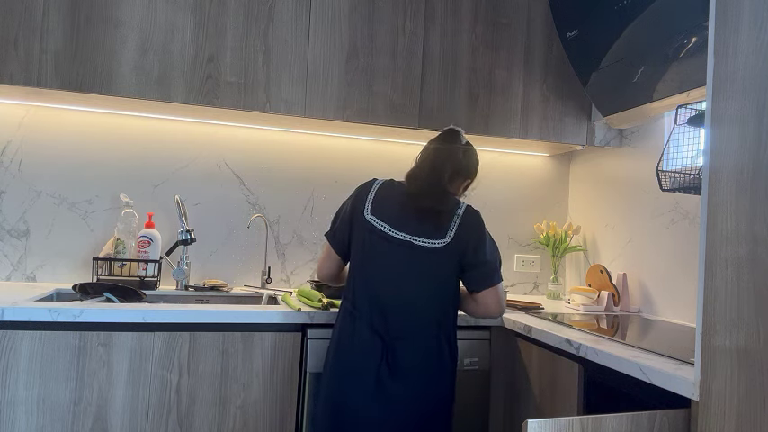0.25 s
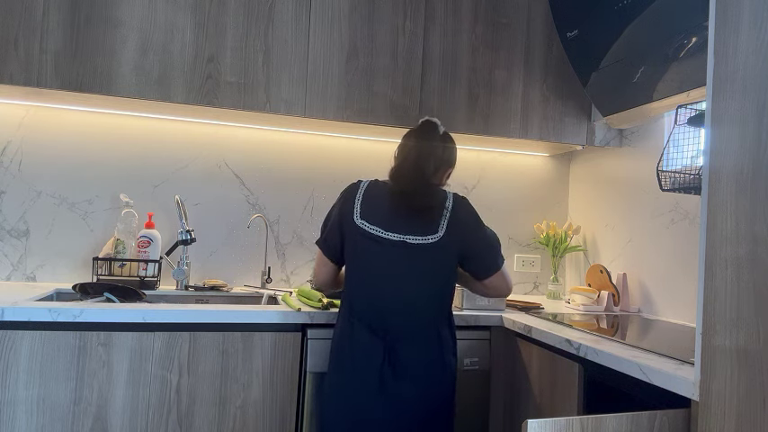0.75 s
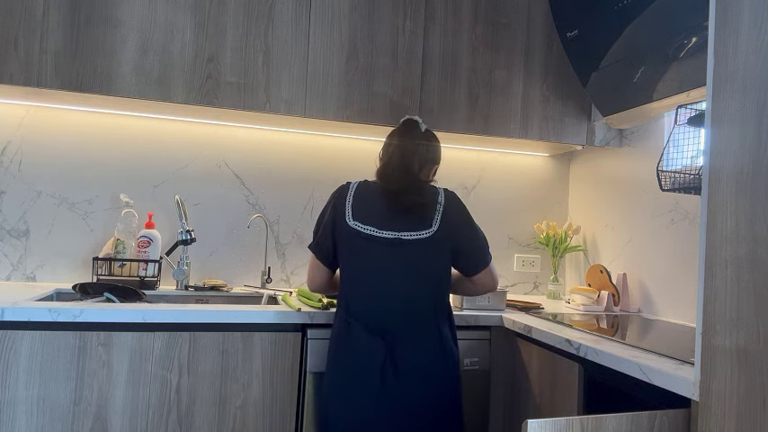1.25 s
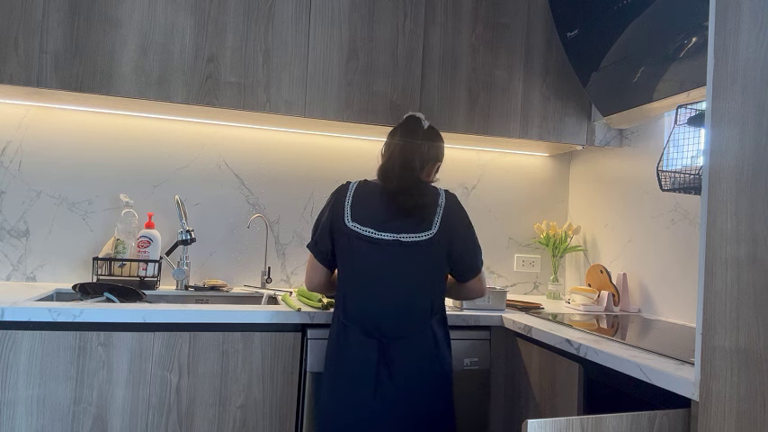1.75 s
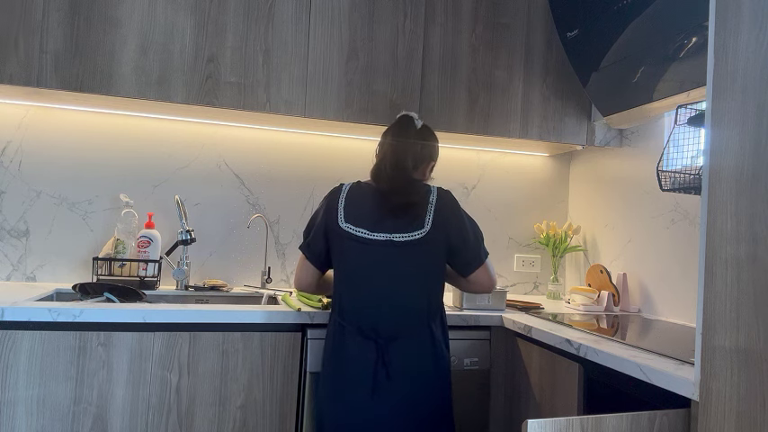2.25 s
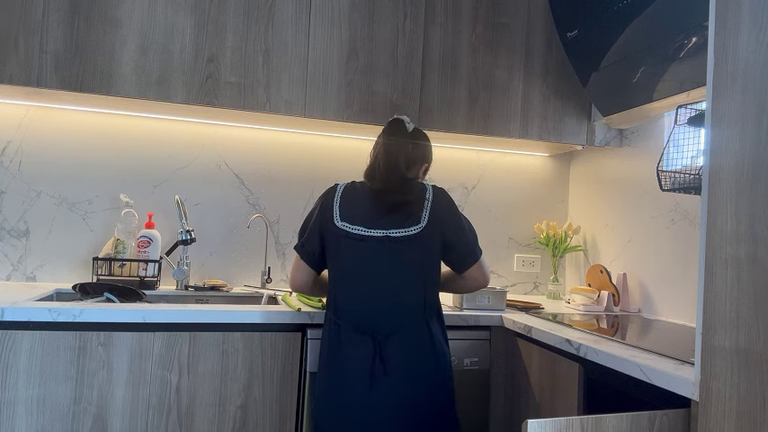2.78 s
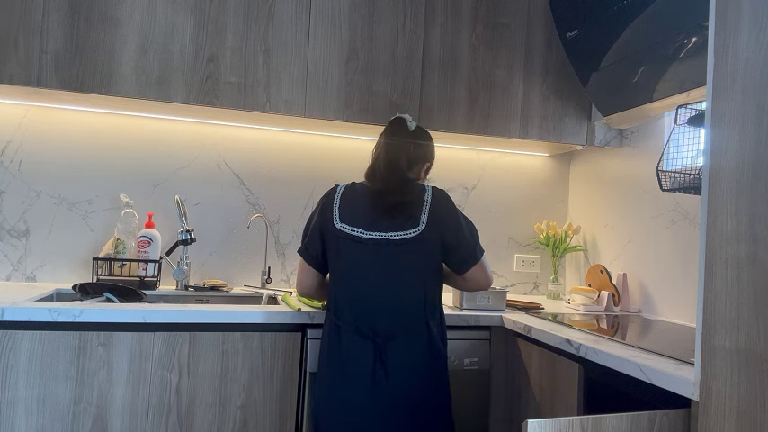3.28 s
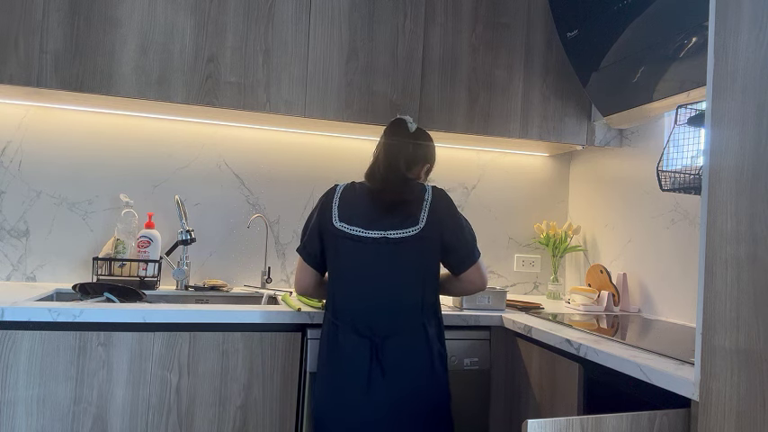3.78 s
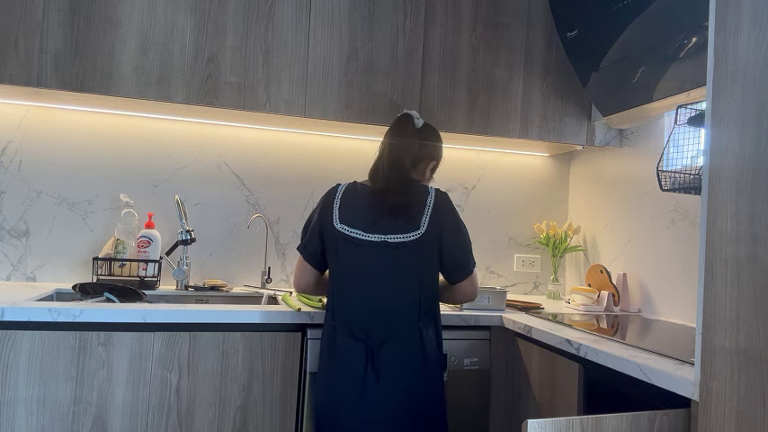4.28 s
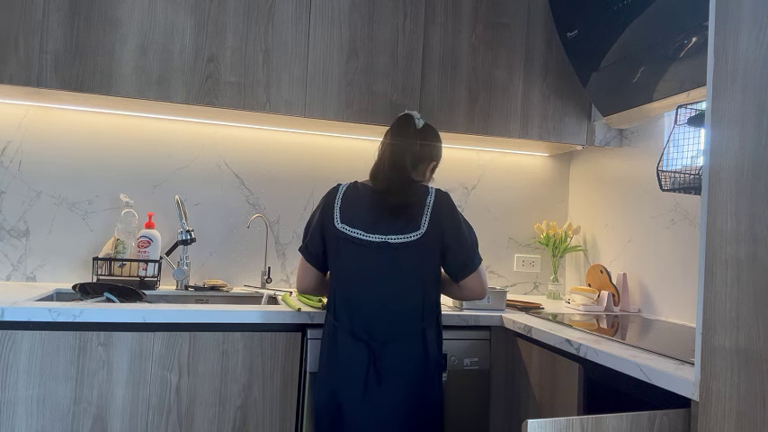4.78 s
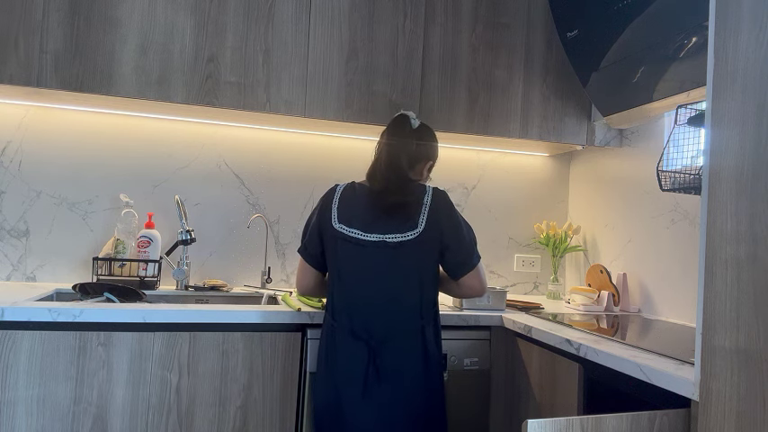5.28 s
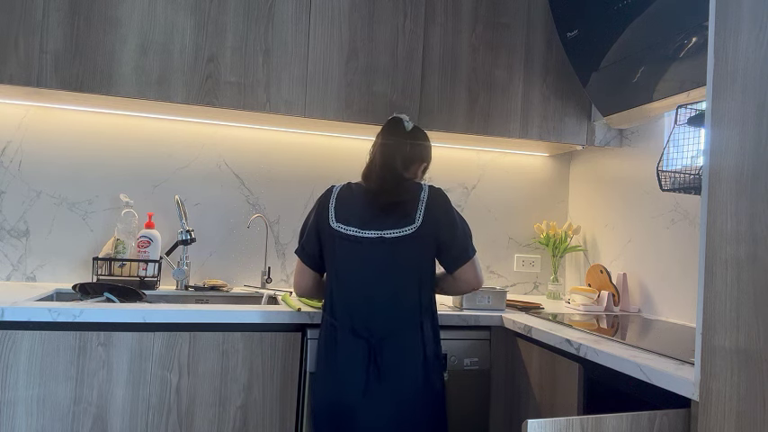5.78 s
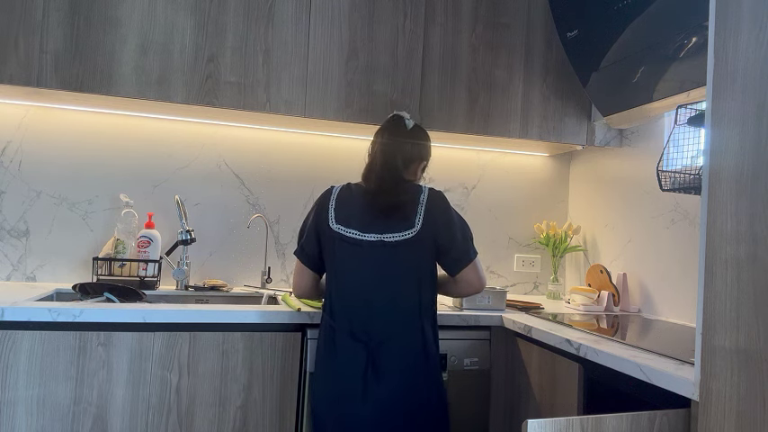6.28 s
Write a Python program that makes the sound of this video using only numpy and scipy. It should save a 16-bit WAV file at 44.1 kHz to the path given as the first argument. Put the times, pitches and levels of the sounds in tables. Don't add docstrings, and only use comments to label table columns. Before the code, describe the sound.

In a hard-surfaced kitchen, someone at the counter bends and snaps fresh stems. Faint fibre crackles lead to a tiny crack and a light snap, then a pause, a full crisp snap, a hollower one, and after a longer wait the loudest, brightest crack. Each knocks a tub-like thud below. A steady low fan rush continues; stereo microphone a few metres away, with clear room echo.

```python
import sys
import numpy as np
from scipy import signal
from scipy.fft import rfft, irfft, next_fast_len
from scipy.io import wavfile
from scipy.ndimage import uniform_filter1d

SR = 44100
rng = np.random.default_rng(int(sys.argv[2]) if len(sys.argv) > 2 else 0)


def persist_wave(psi):
    counts = np.round(np.clip(psi, -1, 1) * 32767).astype(np.int16)
    wavfile.write(sys.argv[1], SR, np.atleast_2d(counts).T)


def amplitude_ratio(level_db):
    exponent = np.asarray(level_db, float) / 20
    return 10 ** exponent


N = 288569

# (time [s], hollow pop [dB], fleshy pop [dB], low crack [dB], high crack [dB])
STEM_SNAPS = [
    (1.119, -55, -38.5, -26.5, -28),
    (1.365, -30, -28.5, -38, -32),
    (2.698, -21, -21.5, -24, -22),
    (3.667, -20, -24, -29, -26),
    (5.601, -15.5, -17.5, -25, -18),
]


def unit(x):
    return x / np.sqrt(np.mean(x ** 2))


def pulse(x):
    return x / np.sqrt(np.sum(x ** 2, axis=-1, keepdims=True))


def band(x, hz, width_hz):
    return signal.lfilter(*signal.iirpeak(min(hz, 0.45 * SR), hz / width_hz, fs=SR), x)


def on_log(hz, table, column=1):
    table = np.array(table)
    return np.interp(np.log(np.maximum(hz, 1)), np.log(table[:, 0]), table[:, column])


def walk(rate):
    hold = int(SR / rate)
    levels = np.repeat(rng.standard_normal(N // hold + 1), hold)
    return 1.277 * uniform_filter1d(uniform_filter1d(levels, hold), hold)[:N]


def pair(length, likeness):
    mid, side = rfft(rng.standard_normal((2, length)))
    likeness = np.clip(likeness, -1, 1)
    sign = np.array([[1], [-1]])
    return (mid * np.sqrt(1 + likeness) + side * np.sqrt(1 - likeness) * sign) / np.sqrt(2)


def response(modes, order):
    hz = np.fft.rfftfreq(8192, 1 / SR) + 1
    power = 0
    for centre, db, width in modes:
        shape = (1 + ((hz - centre * centre / hz) / width) ** 2) ** -order
        power = power + amplitude_ratio(2 * db) * shape / shape.mean()
    cepstrum = irfft(np.log(power) / 2)
    cepstrum[1:len(hz) - 1] *= 2
    cepstrum[len(hz):] = 0
    return irfft(np.exp(rfft(cepstrum)))


def snaps():
    # (centre [Hz], width [Hz])
    crack_bands = [(2000, 2700), (4700, 2500), (7700, 5900), (13500, 5000)]
    # (frequency [Hz], level [dB], width [Hz])
    hollow_modes = [(1150, 0, 320), (1680, -4, 790)]
    out, t = np.zeros((2, N + SR)), np.arange(SR // 20) / SR
    for s, hollow_db, pop_db, low_db, high_db in STEM_SNAPS:
        grain, size = rng.standard_normal((2, len(t)))
        envelope = (t / 0.0022) * np.exp(-t / 0.0019)
        fibres = grain * amplitude_ratio(8.2 * size) * envelope
        burst = np.array([amplitude_ratio(1.6) * pulse(fibres), t == t[60]])
        levels = pop_db, low_db, high_db, high_db - 14
        ring = response([(hz, db + 20.5, w) for (hz, w), db in zip(crack_bands, levels)], order=2)
        crack = signal.fftconvolve(burst, ring[None], axes=1)
        hollow = pulse(response(hollow_modes, order=2)) * amplitude_ratio(hollow_db + 20)
        pop = signal.fftconvolve(burst, hollow[None], axes=1)
        crack = crack + pop * amplitude_ratio(np.array([[0], [-9]]))
        i = int((s - 0.003) * SR)
        out[:, i:i + crack.shape[1]] += crack
    return out[:, :N]


def tub():
    # (frequency [Hz], level [dB], width [Hz])
    tub_modes = [(286, -4, 183), (341.6, 1, 36), (467, -38, 180), (550.6, 0.5, 84), (649.5, 0, 102),
                 (853, -7.5, 94), (1077, -7.5, 220), (1455, -16, 690)]
    # (time [s], level [dB], hardness [dB per octave], struck mid-wall [dB], long ring [dB])
    knocks = [
        (1.369, -20, 1, 2, -11),
        (1.585, -43, 2, 7, -8),
        (2.702, -22, 0.5, 0, -5.5),
        (3.672, -25, 1.5, -2.5, -3.5),
        (5.605, -20.5, 0.5, -3, -5),
    ]
    wall_hz, ring_sharpness = 590, 7
    out = np.zeros((2, N + SR))
    octave = np.log2(np.array(tub_modes)[:, 0] / wall_hz)
    for s, db, hard_db, wall_db, ring_db in knocks:
        gain = hard_db * octave + wall_db * np.exp(-(octave / 0.3) ** 2)
        struck = [(hz, g + more, w) for (hz, g, w), more in zip(tub_modes, gain)]
        thud = pulse(response(struck, order=2))
        ring = pulse(response([(hz, g, w / ring_sharpness) for hz, g, w in struck], order=2))
        i = int(s * SR)
        out[:, i:i + len(ring)] += amplitude_ratio(db + 23.5) * np.array([thud + amplitude_ratio(ring_db) * ring, thud])
    return out[:, :N]


def rustle():
    # (start [s], length [s], final level [dB], growth [dB], share of dull squeak [dB])
    bends = [(0.854, .035, -56.5, 20, -10), (0.952, 0.067, -56.5, 5.5, -0.5), (1.038, 0.14, -50.5, 16, 5),
             (1.584, 0.15, -67, -4.5, -4), (1.656, 0.016, -65, 2, -3), (2.431, 0.11, -52, 20, -7),
             (2.538, 0.12, -51.5, 2, -2.7), (2.97, 0.021, -57, 5, -22), (3.444, .045, -54.5, 11, -3),
             (3.554, 0.051, -46, 31, -5), (3.626, 0.022, -48.5, -11, 4.5), (4.048, .2, -71, -2, -1),
             (5.439, 0.066, -47.5, 19, -33), (5.529, 0.067, -29.5, 36, -15)]
    release_db_per_s = 600
    t, bright, dull = np.arange(N) / SR, np.zeros(N), np.zeros(N)
    for s, length, db, growth_db, dull_db in bends:
        late = t - s - length
        begun = t > s
        slope = np.where(late < 0, growth_db / length, -release_db_per_s)
        effort = begun * amplitude_ratio(db + slope * late * begun)
        bright += effort
        dull += effort * amplitude_ratio(dull_db)
    sizes = amplitude_ratio(2.5 * rng.exponential(size=N))
    tears = unit(rng.standard_normal(N) * sizes * amplitude_ratio(4.5 * walk(90)))
    squeak = band(band(tears, 3500, 5000), 3500, 5000) + amplitude_ratio(-4.0) * band(tears, 3770, 600)
    return bright * unit(band(tears, 7200, 12700)) + dull * unit(squeak)


def kitchen(near, far):
    # (frequency [Hz], t60 [s], left-right likeness [-1 to 1])
    room = [(99, 1, 1), (345, 0.47, 0.7), (594, 0.64, 0.39), (1920, 0.69, 0.026), (5900, 0.64, 0.16),
            (7100, 0.58, 0.88), (12400, 0.43, 0.73), (15500, 0.56, .1)]
    t, hz = np.arange(SR) / SR, np.fft.rfftfreq(SR, 1 / SR)
    noise, tail = pair(SR, on_log(hz, room, column=2)), 0
    for k, (_, t60, _) in enumerate(room):
        share = np.interp(np.log(hz + 1), np.log(np.array(room)[:, 0]), np.arange(len(room)) == k)
        tail = tail + irfft(noise * share) * 1000 ** (-t / t60)
    tail = tail * amplitude_ratio(4.9 * walk(240)[:SR] * np.exp(-t / 0.05))
    build_s = 0.0005
    modes = rfft(tail * (1 - np.exp(-t / build_s)))
    power = uniform_filter1d(np.abs(modes) ** 2, size=36)
    wanted = on_log(hz, room) * SR / (2 * np.log(1000))
    tail = irfft(modes * np.sqrt(wanted / power))[:, :SR * 3 // 4]
    echo_s, echo_db = 0.0138, -2.5
    near = near + amplitude_ratio(echo_db) * np.roll(band(near, 1090, 3400), int(echo_s * SR))
    front_hz, lead_s, bass_hz, left_bass = 2800, 0.0003, 450, 0.36
    low, bass = (signal.sosfiltfilt(signal.butter(2, edge, fs=SR, output="sos"), near)
                 for edge in (front_hz, bass_hz))
    right = near - low + np.roll(low, -int(lead_s * SR))
    front = np.array([near + left_bass * bass, right]) * amplitude_ratio(np.array([[-1.5], [-1]]))
    wet_db = -23.5
    return front + amplitude_ratio(wet_db) * signal.fftconvolve(far[None], tail, axes=1)[:, :N]


def air():
    # (frequency [Hz], density [dB per Hz])
    rush_spectrum = [(20, -40), (30, -27), (53, -6), (91, -7.5), (160, -3.5), (300, -5), (480, -7),
                     (1000, -10), (1950, -13), (3200, -23), (5000, -29.5), (7700, -35.5), (11200, -44),
                     (15500, -40.5)]
    # (frequency [Hz], left-right likeness [-1 to 1])
    rush_likeness = [(60, 0.7), (130, 0.93), (290, 0.61), (640, 0.16), (2000, 0.32), (5500, 0.088),
                     (7500, 0.84), (15000, 0.53)]
    # (frequency [Hz], level [dB])
    fan_tones = [(156.1, -51.5), (199.2, -52.5), (317.6, -55), (366.1, -56.5), (473.7, -52.5),
                 (629.8, -58.5), (796.7, -56)]
    size = next_fast_len(N)
    hz = np.fft.rfftfreq(size, 1 / SR)
    noise = pair(size, on_log(hz, rush_likeness)) * amplitude_ratio(on_log(hz, rush_spectrum)) * (hz > 20)
    low = 1 / (1 + (hz / 900) ** 2)
    rush = sum(irfft(noise * share)[:, :N] * amplitude_ratio(0.8 * walk(3)) for share in (low, 1 - low))
    tones = 0
    for tone_hz, db in fan_tones:
        level = amplitude_ratio(db - 2.5 + 4.24 * walk(9))
        turns = np.cumsum(tone_hz * (1 + 0.005794 * walk(4))) / SR
        tones = tones + level * np.sin(2 * np.pi * turns)
    return (amplitude_ratio(-41.5) * unit(rush) + tones) * amplitude_ratio(np.array([[0.4], [-0.4]]))


def boom():
    # (time [s], level [dB], hold [s])
    thuds = [(.17, -39, 0.033), (0.678, -45, .05), (1.049, -54, .02), (1.193, -34, 0.053),
             (1.42, -32.5, 0.045), (1.89, -49, .02), (2.33, -44, .07), (2.63, -34.5, 0.16),
             (3.09, -49, .015), (3.22, -50, .08), (3.703, -41, 0.057), (4.14, -50, 0.026), (4.55, -47, .02),
             (4.86, -49, .03), (5.58, -41.5, .15), (5.85, -52, .015), (6.4, -46.5, .1)]
    rise_db_per_s, fall_db_per_s, stir_db = 200, 150, -65.5
    boom_hz, width_hz = 57, 17
    t = np.arange(N) / SR
    stir = band(band(rng.standard_normal(N), boom_hz, width_hz), boom_hz, width_hz)
    swell = stir / np.sqrt(uniform_filter1d(stir ** 2, size=SR // 10) + 0.14 * np.mean(stir ** 2))
    push = amplitude_ratio(stir_db)
    for s, db, hold in thuds:
        rise = rise_db_per_s * np.maximum(s - t, 0)
        fall = fall_db_per_s * np.maximum(t - s - hold, 0)
        push = push + amplitude_ratio(db - rise - fall)
    return swell * push * amplitude_ratio(-6.0)


def scene():
    near, far = snaps() + tub() + rustle()
    return kitchen(near, far) + air() + boom()


def top_cut(x):
    return signal.sosfilt(signal.butter(12, 15960, fs=SR, output="sos"), x)


def record(dry):
    # (frequency [Hz], lag [rad])
    port_lag = [(0, 0), (1800, 3.1), (3900, 9.4), (6000, 10.9), (8000, 12.57), (15000, 22.1)]
    # (low edge [Hz], high edge [Hz])
    gaps_hz = [
        [(9800, 10850), (14650, 17000)],
        [(7650, 8350), (11900, 13300)],
    ]
    size, t = next_fast_len(N), np.arange(N) / SR
    hz = np.fft.rfftfreq(size, 1 / SR)
    left, right = rfft(dry, size)
    right = right * np.exp(-1j * np.interp(hz, *np.transpose(port_lag)))
    both = np.array([left + right, left - right]) / 2 * (hz < 15850)
    gaps = [sum((hz > lo) & (hz < hi) for lo, hi in edges) for edges in gaps_hz]
    before_s, after_s, loud_db, longer_s_per_db, open_db = 0.032, 0.004, -20, 0.03, -5
    opened = 0.0
    for s, *_, high_db in STEM_SNAPS:
        end = s + after_s + longer_s_per_db * max(high_db - loud_db, 0)
        opened = opened + ((t > s - before_s) & (t < end))
    attack = uniform_filter1d(1.0 * opened, size=400)
    lost = irfft(both * gaps, size)[:, :N] * (1 - attack * amplitude_ratio(open_db))
    mid, side = irfft(both, size)[:, :N] - lost
    return top_cut(np.array([mid + side, mid - side]))


dry = scene()
out = record(dry)
persist_wave(out)
```